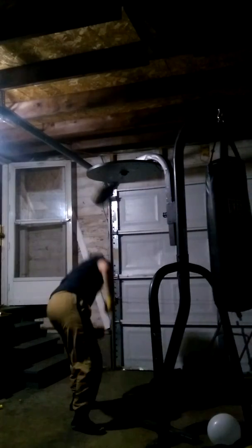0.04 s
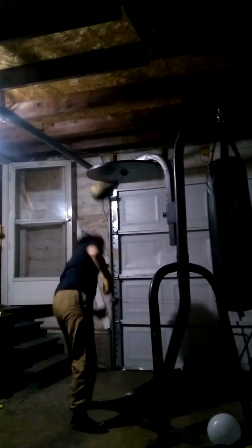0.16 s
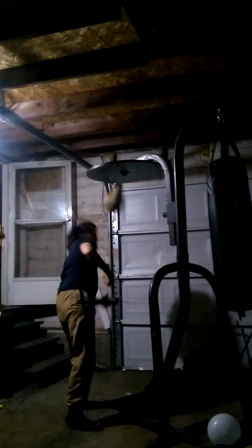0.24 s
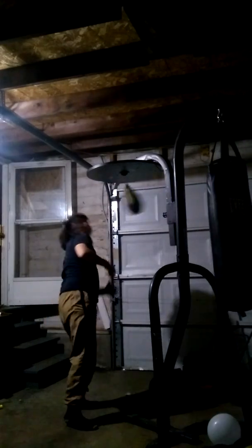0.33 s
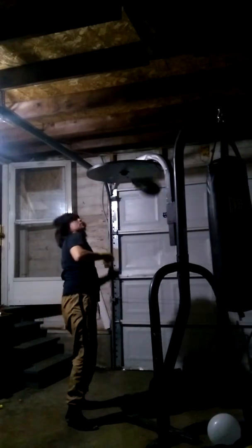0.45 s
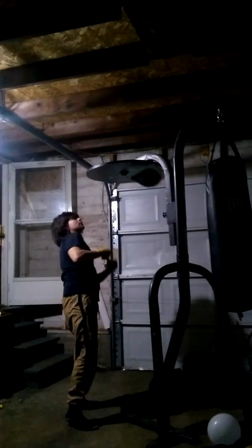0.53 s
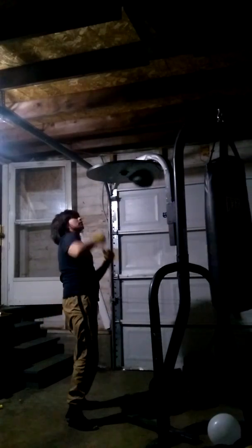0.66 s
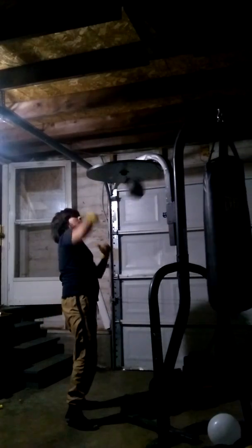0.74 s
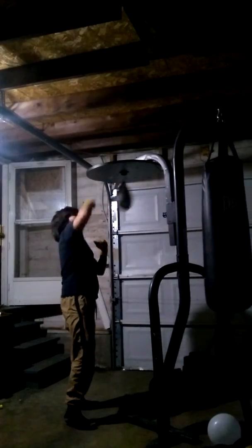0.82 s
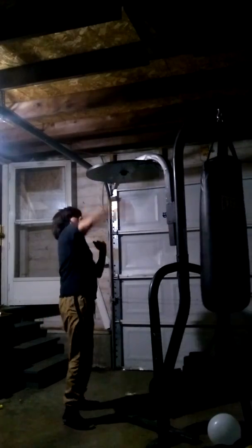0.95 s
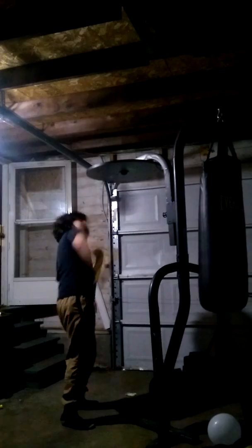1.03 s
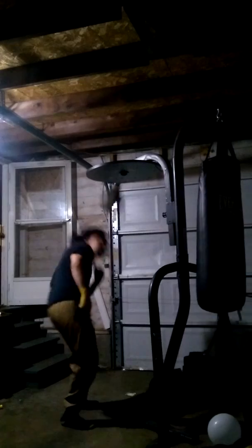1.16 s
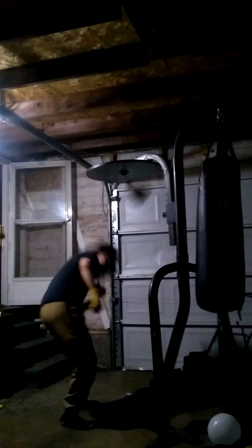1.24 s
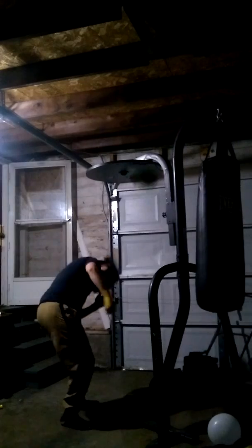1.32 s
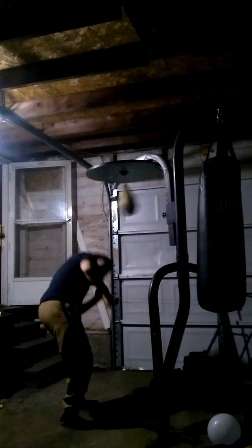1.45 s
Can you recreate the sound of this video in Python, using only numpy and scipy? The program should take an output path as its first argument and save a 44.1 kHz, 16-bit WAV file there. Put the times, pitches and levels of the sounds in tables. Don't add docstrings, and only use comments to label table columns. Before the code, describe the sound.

A speed bag is punched once in a bare garage: a leathery thud, an almost immediate loud slap and crack on the board, then weakening knocks, rattles and cloth rustle, picked up in stereo from a few metres.

```python
import sys
import numpy as np
from scipy import signal
from scipy.fft import rfft, irfft, next_fast_len
from scipy.io import wavfile
from scipy.ndimage import uniform_filter1d

SR = 44100
rng = np.random.default_rng(int(sys.argv[2]) if len(sys.argv) > 2 else 0)


def gain_from_db(level_db):
    decades = np.asarray(level_db, float) / 20
    return 10 ** decades


def unload_wav(signal):
    wavfile.write(
        sys.argv[1],
        SR,
        np.round(np.clip(np.atleast_2d(signal).T, -1, 1) * 32767).astype(np.int16),
    )


N = 66150
T = np.arange(N) / SR
SIZE = next_fast_len(N + SR)
HZ = np.arange(SIZE // 2 + 1) * SR / SIZE
DIRECT_LAG = 10


def rms_one(x):
    return x / np.sqrt(np.mean(x ** 2) + 1e-20)


def at_hz(points, hz):
    curve_hz, value = np.transpose(points)
    return np.interp(np.log(hz + 1e-9), np.log(curve_hz), value)


def swell(start, rise, fall):
    t = T - start
    fade_in = np.sin(np.clip(t / rise, 0, 1) * np.pi / 2) ** 2
    return fade_in * np.exp(-np.maximum(t - rise, 0) / fall)


def band_pass(x, low_hz, high_hz):
    return signal.sosfilt(signal.butter(2, [low_hz, high_hz], "band", fs=SR, output="sos"), x)


def half_sine(start, length):
    return np.sin(np.pi * np.clip((T - start) / length, 0, 1))


def struck(times, blows, modes):
    spread_db = rng.normal(0, 2, (len(blows), len(modes)))
    pushes = np.array([gain_from_db(db) * half_sine(start, length) / (length * SR)
                       for start, (db, length) in zip(times, blows)])
    out = 0
    for k, (hz, level_db, t60) in enumerate(modes):
        r, w = gain_from_db(-60 / (t60 * SR)), 2 * np.pi * hz / SR
        force = gain_from_db(level_db + spread_db[:, k]) @ pushes
        out = out + signal.lfilter([0, np.sin(w)], [1, -2 * r * np.cos(w), r * r], force + 1e-18)
    return out


PUNCH_S = [
    .2281,
    .2385,
    .248,
]
# (level [dB], contact [s])
PUNCH = [(-19.5, 0.00036), (-14.5, 0.0006), (-19.5, 0.00078)]
# (frequency [Hz], level [dB], t60 [s])
BAG = [(102.6, -5.5, 0.044), (171, -3, 0.16), (280, -18.5, 0.02), (349, 10, 0.055), (430, -8.5, 0.54),
       (555, 3, 0.028), (760, -28.5, 0.046), (983, -9.5, 0.36), (2230, 8, 0.014)]


def punched_bag():
    return struck(PUNCH_S, PUNCH, BAG)


SLAP_S = [
    .2714,
    .2730,
    .2762,
    .325,
    .425,
    1.2742,
]
# (level [dB], contact [s])
SLAP = [(-17, 0.00037), (-14.5, 0.00055), (-14, 0.00033), (-19, 0.0021), (-28.5, 0.00087), (-45.5, 0.00087)]
# (frequency [Hz], level [dB], t60 [s])
BOARD = [(90, -4.5, 0.16), (129, 1, 0.086), (159, -4, 0.17), (280, -6, 0.11), (427, -31.5, 0.038),
         (502, 0, 0.048), (597, 3.5, 0.022), (760, 1.5, 0.032), (943, -12.5, 0.0099), (1100, -5.5, 0.017),
         (1470, 4.5, 0.0043), (2030, 8.5, 0.0096), (2100, -9, 0.013), (2697, -4, 0.021)]


def slapped_board():
    return -struck(SLAP_S, SLAP, BOARD)


SNAP_S = [
    .2283,
    .2386,
    .2715,
    .2775,
    .6175,
    .7718,
    .922,
    .9665,
]
# (peak [dB], decay [s], low edge [Hz], high edge [Hz])
SNAPS = [(-24, 0.038, 870, 5450), (-46, .021, 1800, 3420), (-16.5, 0.0014, 1200, 4800),
         (-14.5, 0.014, 3000, 3080), (-31, 0.0079, 1620, 5700), (-33, 0.01, 1570, 6950),
         (-37, 0.013, 2050, 4100), (-48, .012, 1400, 13000)]


def leather():
    out = 0
    for start, (db, decay, low_hz, high_hz) in zip(SNAP_S, SNAPS):
        burst = gain_from_db(db) * rng.standard_normal(N) * swell(start, .0005, decay)
        out = out + band_pass(burst + 1e-18, low_hz, high_hz)
    return out


CRACK_S = [
    .2780,
    .6171,
    .7713,
    .9220,
    1.2232,
]
CRACK_DB = [0.5, -40.5, -42, -40.5, -66]


def swivel():
    sweep_s, from_hz, to_hz, roughness = .0013, 16000, 2000, .2
    knock_db, knock_s = -3, .00035
    rough = roughness * rng.standard_normal(N)
    fall = np.log(to_hz / from_hz)
    out = 0
    for start, db in zip(CRACK_S, CRACK_DB):
        part = np.clip((T - start) / sweep_s, 0, 1)
        turns = from_hz * sweep_s * (np.exp(fall * part) - 1) / fall
        envelope = np.sin(np.pi * part ** .7) ** .4 * (part < 1)
        out = out + gain_from_db(db) * envelope * (np.sin(2 * np.pi * turns) + rough)
        out = out - gain_from_db(db + knock_db) * half_sine(start, knock_s)
    return out


RATTLE_S = [.602, .636, .635, .768, .774, .899, .908, .932, .928, 1.275, .64, 1.27, 1.288, 1.426]
# (level [dB], rise [s], fall [s], centre [Hz])
RATTLES = [(-44.5, .04, 0.022, 650), (-44.5, 0.028, 0.03, 1260), (-43, 0.03, 0.014, 2800),
           (-47, 0.032, 0.057, 760), (-50, 0.019, 0.08, 2700), (-40.5, 0.032, 0.014, 403),
           (-44.5, 0.0078, 0.017, 810), (-49, 0.047, 0.014, 1600), (-52, 0.0072, 0.044, 2470),
           (-40, 0.019, .03, 443), (-42, 0.036, 0.031, 134), (-63, 0.028, 0.031, 110),
           (-47, 0.017, 0.005, 1830), (-45.5, 0.019, 0.014, 560)]


def rattles():
    clicks_per_s, q = 1400, 1.4
    out = 0
    for start, (db, rise, fall, hz) in zip(RATTLE_S, RATTLES):
        sizes = gain_from_db(1.6 * np.minimum(rng.exponential(1, N), 4)) * rng.choice([-1, 1], N)
        clicks = sizes * (rng.random(N) < clicks_per_s / SR)
        scrape = 0.09 * rng.standard_normal(N)
        body = band_pass(clicks + scrape, hz / 2 ** (1.02 / q), hz * 2 ** (0.39 / q))
        out = out + gain_from_db(db) * swell(start, rise, fall) * rms_one(body)
    return out


# (frequency [Hz], level [dB], width [Hz])
HINGE = [(585, 0, 50), (775, 2, 50), (985, 0, 70), (1220, -12, 120), (1385, -12, 120)]


def creak():
    start, level_db, rise, fall = .766, -44, .035, .04
    slip_hz, jitter, spread_db = 198, .02, 3
    sag = 0.027
    wobble = rms_one(uniform_filter1d(rng.standard_normal(N), size=300))
    rate = slip_hz * (1 - sag * np.clip((T - start) * 10, 0, 2) + jitter * wobble)
    turns = np.cumsum(rate) / SR
    slips = (np.diff(np.floor(turns), prepend=0) > 0) * gain_from_db(spread_db * rng.standard_normal(N))
    out = 0
    for hz, db, width_hz in HINGE:
        r, w = np.exp(-np.pi * width_hz / SR), 2 * np.pi * hz / SR
        out = out + gain_from_db(db) * signal.lfilter([1 - r, 0, r - 1], [1, -2 * r * np.cos(w), r * r], slips)
    return gain_from_db(level_db) * swell(start, rise, fall) * rms_one(out)


def diffuse(colour):
    port_gap = 18
    a, b = rfft(rng.standard_normal((2, SIZE)))
    alike = np.sinc(2 * HZ * port_gap / SR)
    shared, apart = np.sqrt(1 + alike) * a, np.sqrt(1 - alike) * b
    pair = np.array([shared + apart, shared - apart])
    return rms_one(irfft(pair * gain_from_db(at_hz(colour, HZ)), SIZE)[:, :N])


# (time [s], level [dB], rise [s], fall [s])
SWISHES = [
    (0.128, -56, 0.078, 0.093),
    (1.22, -52, 0.015, 0.13),
    (1.421, -74, 0.052, 0.13),
]
# (frequency [Hz], level [dB per Hz])
SWISH = [(1000, -23.5), (3500, -11), (8500, -10), (12000, -15), (16000, -8.5)]


def sleeves():
    return sum(gain_from_db(db) * swell(start, rise, fall) for start, db, rise, fall in SWISHES) * diffuse(SWISH)


# (time [s], level [dB])
STIR = [(0, -63.5), (.1, -60.5), (.22, -57.5), (.6, -51.5), (1.05, -58.5), (1.15, -64.5), (1.23, -68.5),
        (1.35, -56.5), (1.5, -80.5)]
# (frequency [Hz], level [dB per Hz])
STIR_COLOUR = [(60, 8.5), (150, -1.5), (450, -1), (1150, -3), (1800, -16), (4000, -16.5), (9000, -29.5)]


def stirring():
    slow = uniform_filter1d(uniform_filter1d(rng.standard_normal(N), size=900), size=900)
    level_db = np.interp(T, *np.transpose(STIR)) + 1.1 * rms_one(slow)
    return gain_from_db(level_db) * diffuse(STIR_COLOUR)


# (frequency [Hz], level [dB per Hz])
FLOOR = [(40, -7), (120, 1), (500, -20), (2000, -26.5), (6000, -23.5), (15000, -29)]


def room_tone():
    return gain_from_db(-62.5) * diffuse(FLOOR)


# (frequency [Hz], t60 [s])
ROOM_T60 = [(80, 0.28), (200, 0.58), (500, 0.28), (1500, 0.25), (4000, 0.3), (8000, 0.23), (14000, 0.23)]
# (frequency [Hz], level [dB])
ROOM_COLOUR = [(80, 7.5), (200, -8), (500, 5), (1500, 9), (4000, 11), (8000, 7), (14000, 4.5)]


def room_tail():
    tail_db, rise_s = -32.5, 0.0066
    late_db, late_stretch = -13.5, 2.815
    noise = rfft(diffuse(ROOM_COLOUR), SIZE)
    half_octave = 2 * np.log2(HZ / 45 + 1e-9)
    tail = 0
    for k in range(18):
        band = irfft(noise * np.clip(1 - np.abs(half_octave - k), 0, 1), SIZE)[:, :N]
        fall_db = -60 * T / at_hz(ROOM_T60, 45 * 2 ** (k / 2))
        tail = tail + band * (gain_from_db(fall_db) + gain_from_db(late_db + fall_db / late_stretch))
    return gain_from_db(tail_db) * tail * (1 - np.exp(-(T / rise_s) ** 2))


def path(delay, lag):
    port_delay = delay + np.array([[-.5], [.5]]) * lag / SR
    return np.exp(-2j * np.pi * HZ * port_delay)


# (delay [s], level [dB], right port lag [samples])
ECHOES = [
    (.0028, -17.5, 21),
    (.0104, -33.5, -17),
    (.0152, -13.5, -3.5),
    (0.02, -6.5, -25.5),
]


def garage(x):
    dull_hz = 5700
    paths = rfft(room_tail(), SIZE) + gain_from_db(0.0052) / 1.5 * path(0.00075, DIRECT_LAG)
    for delay, db, lag in ECHOES:
        paths = paths + gain_from_db(db) / (1.5 + 1j * HZ / dull_hz) * path(delay, lag)
    return irfft(paths * rfft(x, SIZE), SIZE)[:, :N]


def scene():
    hits = punched_bag() + slapped_board() + leather() + swivel() + gain_from_db(-5.0) * rattles()
    squeak = creak()
    close_squeak = np.array([squeak, np.roll(squeak, DIRECT_LAG)])
    return garage(hits + gain_from_db(-9) * squeak) + close_squeak + sleeves() + stirring() + room_tone()


def low_pass(x):
    return signal.sosfilt(signal.butter(12, 16230, fs=SR, output="sos"), x)


# (frequency [Hz], level [dB])
RIGHT_PORT = [(100, 3), (400, -0.5), (1000, 4), (3000, -6), (6000, 3.5), (9000, 8), (13000, 8.5)]
# (frequency [Hz], share [0-1])
CANCEL = [(100, .25), (600, .25), (1200, .7), (2450, .94), (3700, .95), (5000, .58), (8600, .64),
          (10500, .25)]
# (frequency [Hz], level [dB])
MIC = [(700, 1), (2500, 5), (4000, -5), (8400, -7.5), (12500, -9.5), (15000, -16.5), (15600, -17),
       (16500, -31)]


def record(dry):
    cancel_lag, low_cut_hz = 17.8, 165
    ports = rfft(dry, SIZE) * gain_from_db([0 * HZ, at_hz(RIGHT_PORT, HZ)])
    other_late = at_hz(CANCEL, HZ) * np.exp(-2j * np.pi * HZ * cancel_lag / SR) * ports[::-1]
    x = irfft((ports - other_late) * gain_from_db(at_hz(MIC, HZ)), SIZE)[:, :N]
    x = signal.sosfilt(signal.butter(3, low_cut_hz, "high", fs=SR, output="sos"), x)
    mix = np.clip(x, -1, 1)
    return low_pass(mix)


dry = scene()
out = record(dry)
unload_wav(out)
```